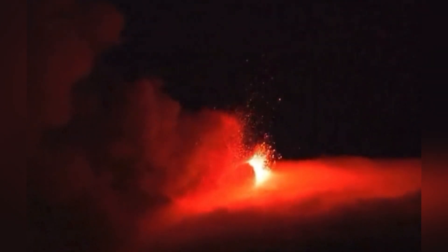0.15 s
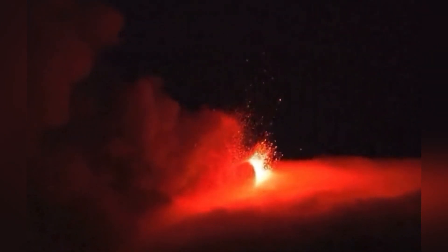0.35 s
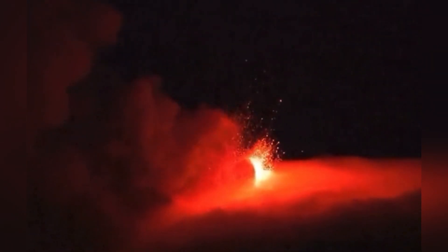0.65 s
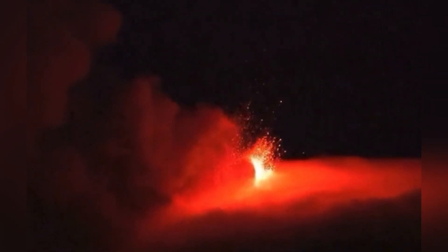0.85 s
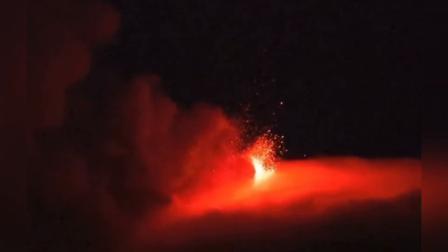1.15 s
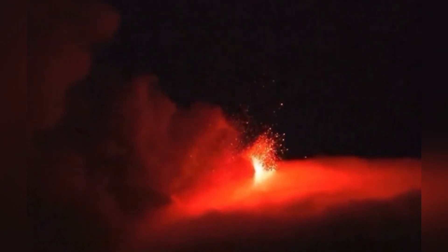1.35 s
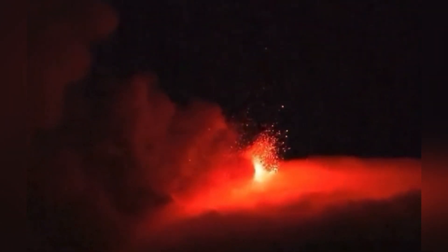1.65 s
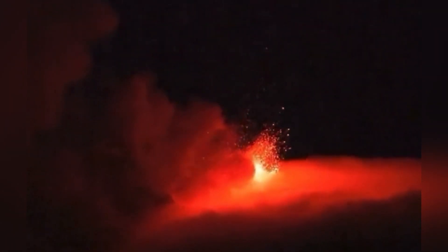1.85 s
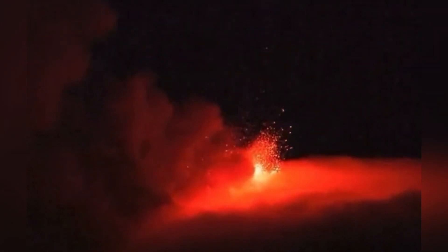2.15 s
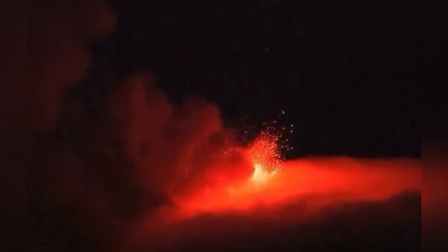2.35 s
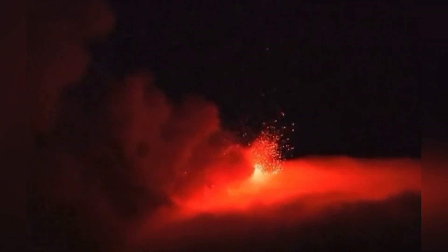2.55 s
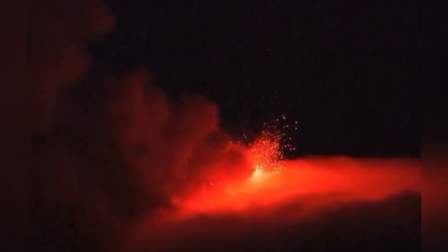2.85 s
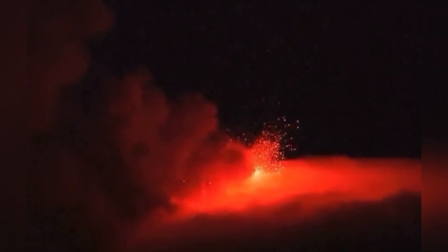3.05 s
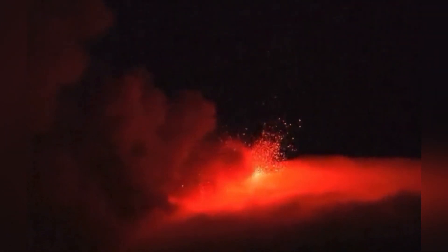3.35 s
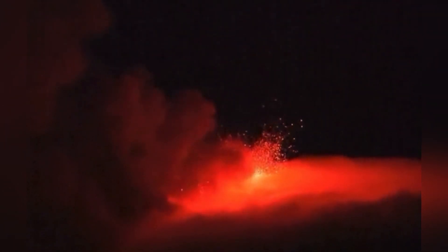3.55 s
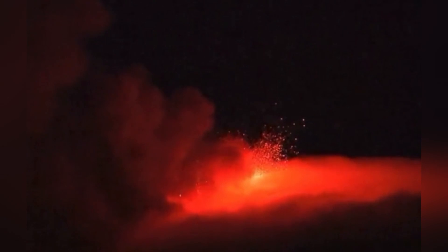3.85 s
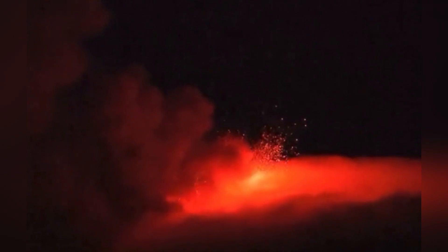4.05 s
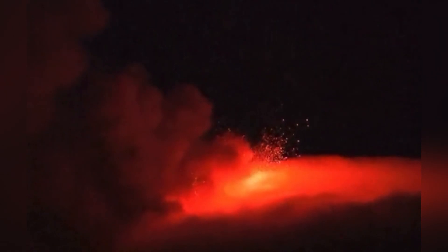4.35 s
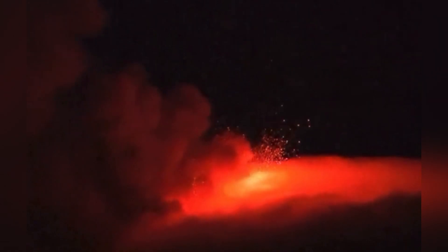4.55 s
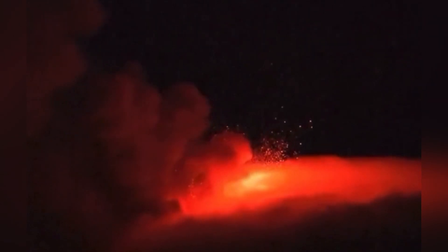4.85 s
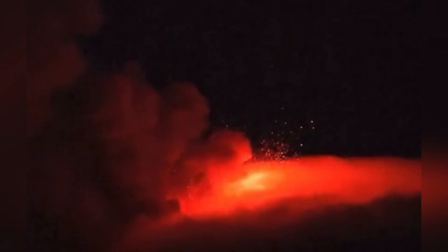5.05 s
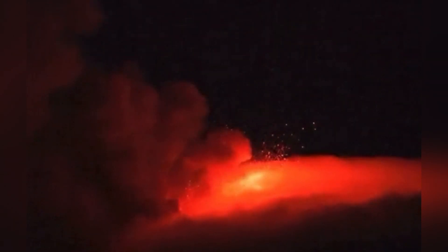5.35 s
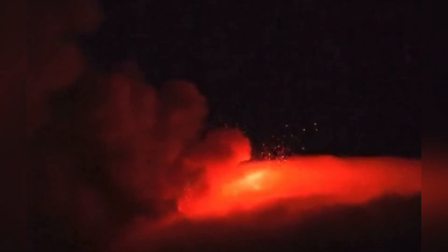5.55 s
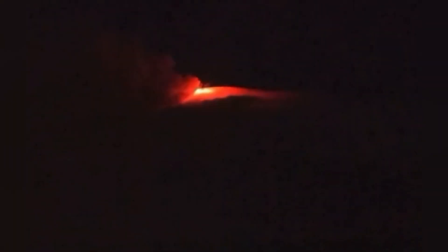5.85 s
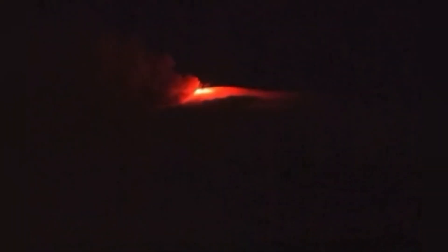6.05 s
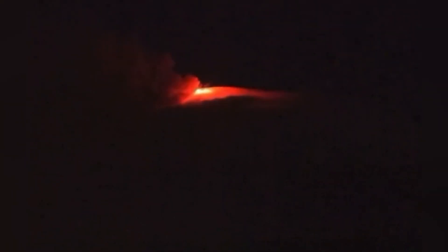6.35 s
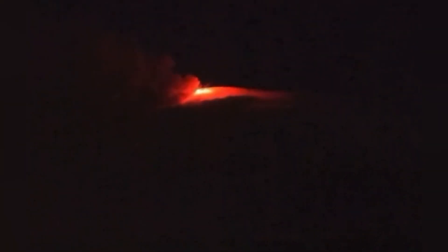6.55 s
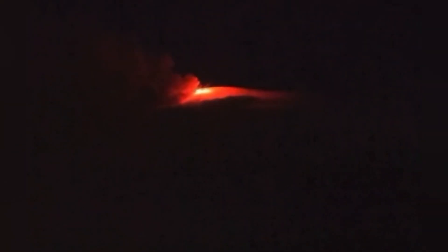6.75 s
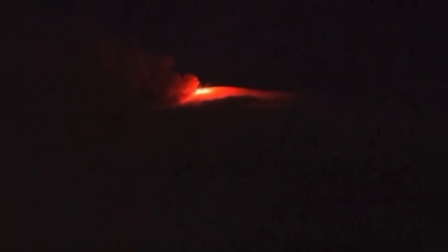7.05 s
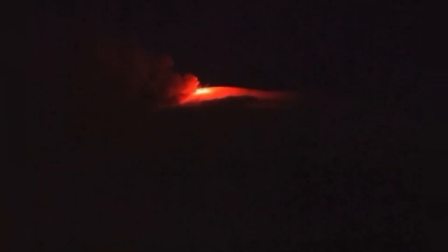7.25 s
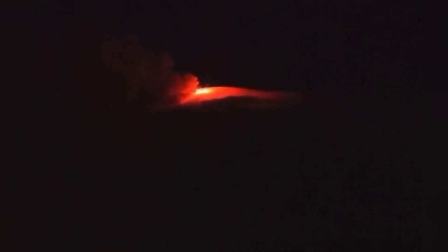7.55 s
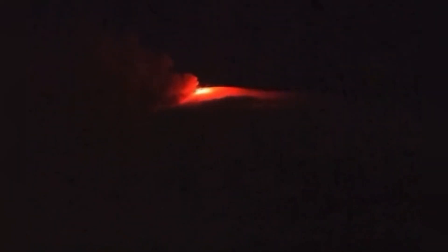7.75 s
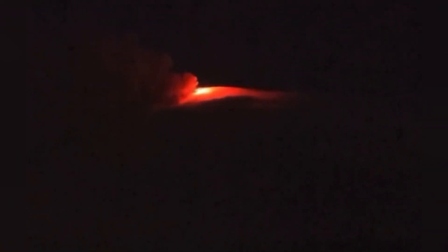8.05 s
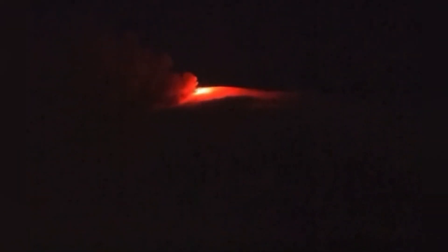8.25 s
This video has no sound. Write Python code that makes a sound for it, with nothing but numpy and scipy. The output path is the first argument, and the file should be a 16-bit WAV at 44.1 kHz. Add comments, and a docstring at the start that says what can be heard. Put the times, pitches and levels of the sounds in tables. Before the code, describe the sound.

Strong wind buffets the microphone over passing cars and an approaching clattering diesel, then a hard cut to a calmer engine drone and faint traffic.

```python
"""At a roadside, wind lumps, thumps and buffets the microphone while cars roll past as coloured tyre noise.
A turbo whistle then rises, and a diesel of exhaust tones, pulsed clatter and ringing panels draws near,
among a few soft knocks close by. A hard cut leads to a calmer spot in lighter wind: an engine drones
in shaft-order tones, a fainter engine note climbs, and far traffic is a dull noise that ebbs;
a few more knocks come late."""
import sys
import numpy as np
from scipy import signal
from scipy.fft import next_fast_len
from scipy.io import wavfile
from scipy.ndimage import uniform_filter1d

SR = 44100
rng = np.random.default_rng(int(sys.argv[2]) if len(sys.argv) > 2 else 0)


def bounce(signal):
    """Save signal as a 16-bit WAV file at the path given by the first command-line argument."""
    frames = np.transpose(np.atleast_2d(signal))
    limited = np.clip(frames, -1, 1)
    pcm = np.round(limited * 32767).astype(np.int16)
    wavfile.write(sys.argv[1], SR, pcm)


def gain_from_db(level_db):
    """Turn a decibel level (scalar or array-like) into a linear amplitude factor."""
    decades = np.asarray(level_db, float) / 20
    return 10 ** decades


N = 371318
T = np.arange(N) / SR  # seconds
CUT_S = 5.788  # the roadside gives way to the calmer spot


def evened(x):
    """Scales to rms 1."""
    return x / np.sqrt(np.mean(x ** 2) + 1e-20)


def smoothed(x, size):
    """Two running means of size samples in a row."""
    return uniform_filter1d(uniform_filter1d(x, size), size)


def read(points, hz):
    """A spectrum table read on a log-frequency axis."""
    f, value = np.transpose(points)
    return np.interp(np.log(hz + 1), np.log(f + 1), value)


def columns(rows, t=T):
    """Each column of a curve table over time."""
    s, *values = np.transpose(rows)
    return [np.interp(t, s, v) for v in values]


def bump(t, middle_s, lasting_s):
    """A bell of height 1 in time, down to 1/e at lasting_s from its middle."""
    return np.exp(-((t - middle_s) / lasting_s) ** 2)


def drift(seconds):
    """Random wander of rms 1, smoothed over the given time."""
    return evened(smoothed(rng.standard_normal(N), round(seconds * SR)))


def noise(colour_db, band_hz, size, patchy_db):
    """Random short-time spectra shaped by colour_db(hz, t), levelled to rms 1 inside band_hz over time."""
    frames, bins = 4 * N // size + 5, size // 2 + 1
    hz = np.arange(bins)[:, None] * SR / size
    t = np.arange(frames)[None] * size / 4 / SR
    real, imaginary, patches = rng.standard_normal((frames, bins, 3)).T
    patches = evened(uniform_filter1d(uniform_filter1d(patches, 12, 0), 10, 1))
    colour = gain_from_db(colour_db(hz, t)) * np.ones((bins, frames))
    in_band = (hz >= band_hz[0]) * (hz < band_hz[1])
    colour /= np.linalg.norm(colour * in_band, axis=0)
    spectra = (real + 1j * imaginary) * colour * gain_from_db(patchy_db * patches)
    whole_rms = np.sqrt(np.mean(np.sum(colour ** 2, 0)))  # in and out of the band
    sound = signal.istft(spectra, nperseg=size, noverlap=size * 3 // 4)[1][:N]
    return whole_rms * evened(sound)


def tone(hz, waver):
    """A sine of rms 1 on a pitch curve, its phase wavering by waver radians rms."""
    cycles = np.cumsum(hz) / SR + rng.random()
    return np.sqrt(2) * np.sin(2 * np.pi * cycles + waver * drift(0.015))


def wind():
    """Eddies press on the diaphragm as slow lumps and quicker thumps."""
    # Wind before the buffets clear it. Each row: time in seconds, level of the lumps in dB.
    strength = [(0, -23.5), (.35, -26.5), (.7, -19.5), (1.0, -27), (1.25, -32.5), (1.7, -25), (2.4, -31),
                (2.65, -31.5), (2.95, -35), (3.3, -39), (4.3, -38), (5.1, -43), (5.4, -28.5), (5.78, -31.5),
                (5.8, -48), (7.3, -46), (8.42, -48)]
    # Colours of the two kinds of eddy. Each row: frequency in Hz, density in dB per Hz.
    lump_colour = [(12, -5.5), (20, -2.5), (37, -1), (55, -4), (72, -15), (100, -22.5), (300, -150)]
    thump_colour = [(20, -71), (62, 2.5), (80, -1.5), (110, -5.5), (150, -14.5), (220, -35), (1000, -150)]
    lumps_db = columns(strength)[0]
    thumps_db = lumps_db - 3
    out = 0
    for points, level_db in (lump_colour, lumps_db), (thump_colour, thumps_db):
        eddies = noise(lambda hz, t: read(points, hz), (0, SR), size=4096, patchy_db=0.9)
        swing = abs(signal.hilbert(eddies, next_fast_len(N))[:N]) + 0.19
        fairly_even = eddies / smoothed(swing, 400) ** 0.25  # large eddies held back a little
        out = out + gain_from_db(level_db) * evened(fairly_even)
    return out


def buffeted(steady):
    """Each buffet pushes or pulls the diaphragm, rebounding on either side; the air around it gives way."""
    # Single buffets. Each row: middle in seconds, peak in dB, frequency in Hz.
    gusts = [(.015, -18, 45.2), (0.097, -16, 40), (0.133, -16.5, 50), (0.248, -10, 55), (.282, -13.5, 65),
             (.471, -16.5, 55), (.6, -17.5, 35.2), (0.652, -14.5, 50.3), (.69, -13.5, 60.6),
             (.765, -9.5, 50.3), (.849, -17, 43.7), (0.892, -16.5, 50), (0.959, -13, 48), (1.03, -14.5, 53),
             (1.446, -17, 55), (1.553, -15.5, 37.7), (1.724, -23.5, 60), (1.863, -17.5, 45.5),
             (1.911, -16.5, 41.2), (2.01, -15.5, 54.7), (2.39, -16, 52), (2.531, -14.5, 39.8),
             (2.685, -20, 44.6), (2.849, -22, 40), (3.139, -21, 54.4), (4.359, -23, 55), (4.536, -21.5, 58),
             (4.76, -19, 70), (5.324, -18, 44.3), (5.411, -15.5, 45.2), (5.55, -20, 45.87),
             (5.701, -26, 34.8), (6.6, -32, 28), (8.0, -32, 32)]
    half_length_cycles = 0.57
    cleared = 0.48  # share of the sound so far, earlier buffets too, taken away at the middle
    out = steady.copy()
    for (s, db, hz), way in zip(gusts, rng.choice([-1, 1], len(gusts))):
        out *= 1 - cleared * bump(T, s, 1 / hz)
        out += way * gain_from_db(db) * bump(T, s, half_length_cycles / hz) * np.cos(2 * np.pi * hz * (T - s))
    return out


def tyres():
    """Tread roar, brighter when near; groove air whooshes at sinking resonances; an engine ticks on top."""
    # Cars rolling by. Each row: time in seconds, roar in dB at 400-2500 Hz, nearness 0-1 that brightens it.
    passing = [(0, -40, 0.52), (.6, -40.5, 0.52), (.95, -42.5, 0.57), (1.35, -41, 0.69), (1.9, -38.5, 0.63),
               (2.15, -40.5, .55), (2.38, -39, .5), (2.6, -42, 0.37), (3.1, -44, 0.26), (3.6, -44, 0.17),
               (5.79, -44, 0.04)]
    # Roar close to the microphone and at a distance. Each row: frequency in Hz, density in dB per Hz.
    near_colour = [(88, -41), (150, -11), (196, -13), (294, -5.5), (477, -14), (624, -13), (883, -10.5),
                   (1180, -0.5), (1400, -8), (1700, -10), (2060, -12.5), (11200, -36.5), (12900, -53),
                   (15000, -87)]
    far_colour = [(88, -34), (150, -4.5), (185, 0), (216, -5), (350, -16.5), (416, -12.5), (477, -13),
                  (1110, -17), (1250, -18), (1700, -16.5), (5720, -51.5), (12600, -72), (15000, -83)]
    # Groove whooshes. Each row: loudest in seconds, lasting in seconds, frequency then in Hz,
    # height over the roar in dB.
    grooves = [(.15, 0.35, 1290, 4.5), (.6, 0.17, 1230, -1), (1.8, 0.25, 1180, -1), (2.36, 0.065, 1070, -1),
               (2.6, 0.073, 960, -16)]
    fall_hz_per_s, half_width_hz = 60, 150
    # Ticks of a passing engine. Each row: time in seconds, firing rate in Hz, depth 0-1.
    ticking = [(0, 43.8, .2), (.55, 44, 0.2), (.77, 39.7, 0.6), (1.5, 40.2, 0.9), (1.7, 40, 1),
               (2.1, 39.8, 0.8), (2.5, 38.4, 1), (2.8, 38, 0.3)]
    tick_band_hz, tick_swing_db = (4250, 6400), 7.5  # trough to peak at full depth

    def colour_db(hz, t):
        near = columns(passing, t)[1]
        groove_power = 0
        for s, lasting, f, db in grooves:
            off_centre = (hz - f + fall_hz_per_s * (t - s)) / half_width_hz
            groove_power = groove_power + gain_from_db(2 * db) * bump(t, s, lasting) / (1 + off_centre ** 2)
        roar_db = near * read(near_colour, hz) + (1 - near) * read(far_colour, hz)
        return roar_db + 10 * np.log10(1 + groove_power)

    roar = gain_from_db(columns(passing)[0]) * noise(colour_db, (400, 2500), size=1024, patchy_db=0.8)
    firing_hz, depth = columns(ticking)
    pulse = np.sin(np.pi * np.cumsum(firing_hz) / SR) ** 4  # one peak per firing
    tick = gain_from_db(tick_swing_db * depth * (pulse - 0.42))
    band = signal.butter(2, tick_band_hz, "band", fs=SR, output="sos")
    treble = signal.sosfiltfilt(band, roar)
    return roar + (tick - 1) * treble


def turbo():
    """A spinning turbo whistles as one gliding tone, its pitch more smeared the fainter it is."""
    # Whistle. Each row: time in seconds, pitch in Hz, level in dB before its random flicker.
    glide = [(2.4, 9250, -105), (2.72, 9420, -89), (2.9, 9550, -87), (3.15, 9620, -92), (3.4, 9670, -88),
             (3.9, 9840, -87), (4.2, 9760, -87), (4.45, 9660, -82), (4.64, 9770, -68), (4.76, 9880, -68),
             (4.97, 10170, -70), (5.18, 10310, -70), (5.33, 10420, -75), (5.45, 10560, -66),
             (5.56, 10700, -74), (5.63, 11000, -65), (5.69, 11150, -75), (5.79, 11500, -67)]
    hz, db = columns(glide)
    fuzz = np.clip(.004 - .0004 * (db + 72), .004, .012)  # share of the pitch
    smeared_hz = hz * (1 + fuzz * drift(.001) + 0.0015 * drift(.02))
    return gain_from_db(db + 2.6 * drift(0.03)) * tone(smeared_hz, waver=.7)


def diesel():
    """Exhaust orders, clatter that puffs at each firing, panels that ring with it, and the turbo."""
    # The engine. Each row: time in seconds, firing rate in Hz, fourth exhaust order in dB,
    # clatter in dB at 4-9 kHz.
    running = [(2.8, 48.08, -56, -73), (3.1, 47.4, -47.5, -85), (3.4, 46.53, -45, -92),
               (3.75, 45.74, -46, -68), (4, 44.56, -49.5, -64), (4.33, 44.44, -52, -63.5),
               (4.42, 45.07, -53, -57.5), (4.7, 44.7, -52, -54), (5.1, 47.52, -47.5, -52.5),
               (5.5, 49.16, -50, -52.5), (5.79, 51.6, -48, -55.5)]
    # Clatter at the reference level. Each row: frequency in Hz, density in dB per Hz.
    clatter_points = [(180, -13), (300, -0.5), (658, -14.5), (738, -15.5), (1190, -8), (2100, -9.5),
                      (2600, -7), (4320, -10), (5090, -16.5), (7420, -19), (10500, -28.5), (12500, -28),
                      (14300, -30), (15000, -67)]
    # Engine panels. Each row: centre in Hz, width in Hz, relative height on the clatter colour in dB
    # before it swells or rings in fits, loudest in seconds.
    panel_rows = [(745, 45, 22.5, 5.2), (970, 80, 10, 4.0), (1600, 75, 15, 4.1), (2100, 80, 15.5, 5.15),
                  (2960, 160, 8, 5.1), (3300, 130, 4, 5.5), (3480, 120, 7, 4.0), (3900, 300, 4, 4.1),
                  (4290, 140, 8.5, 4.7), (5490, 300, 2, 5.2), (6860, 180, 4, 5.2), (7280, 250, 8, 4.0)]
    facing_s = 0.88  # how long a panel faces the microphone
    hz, fourth_db, clatter_db = columns(running)
    reference_db = -49.5  # clatter level from which distance is reckoned
    over_reference_db = clatter_db - reference_db

    first_db = -32 + 0.2 * over_reference_db
    exhaust = gain_from_db(first_db) * (tone(hz, waver=0.11) + 0.39 * tone(2 * hz, waver=0.52))
    exhaust += gain_from_db(fourth_db) * tone(4 * hz, waver=.15)
    # a low note swells briefly below the second order, gliding up
    hum_s = 4.7
    exhaust += gain_from_db(-40.5) * bump(T, hum_s, 0.26) * tone(82 + 12 * (T - hum_s), waver=.2)

    def clatter_colour_db(f, t):
        far_db = columns(running, t)[2] - reference_db  # quieter means farther, and distance dulls the treble
        return read(clatter_points, f) + 0.47 * far_db * np.log2(f / 6000 + 0.21)

    ringing_db = [2.3 * drift(.015) for _ in panel_rows]  # each panel rings in fits

    def panel_colour_db(f, t):
        peaks = 0
        for (centre, width, db, s), fits_db in zip(panel_rows, ringing_db):
            power = gain_from_db(2 * (db + np.interp(t, T, fits_db))) * (0.22 + bump(t, s, facing_s))
            peaks = peaks + power / (1 + (2 * (f - centre) / width) ** 2) ** 2
        return clatter_colour_db(f, t) + 10 * np.log10(peaks)

    turns = np.cumsum(hz) / SR  # firings so far
    uneven = gain_from_db(2.5 * rng.uniform(-1, 1, 1000))[turns.astype(int)]  # no two firings alike
    strong = (1 + 0.59 * (turns % 2 < 1)) * uneven  # every second cylinder knocks harder
    puffs = evened(1 + 0.61 * strong * np.sin(np.pi * (turns % 1) ** 0.45) ** 4)
    clatter = puffs * noise(clatter_colour_db, (4000, 9000), size=2048, patchy_db=1.6)
    ringing = puffs * noise(panel_colour_db, (4000, 9000), size=1024, patchy_db=1.8)
    panels = gain_from_db(-3.2 + .5 * over_reference_db) * ringing
    heard = np.clip((T - running[0][0]) / 0.045, 0, 1)  # fades in over 45 ms
    return heard * (exhaust + gain_from_db(clatter_db) * (clatter + panels)) + turbo()


def drone():
    """Shaft orders of an engine, the fifth booming in the exhaust, and one more engine note."""
    # The engine. Each row: time in seconds, shaft rate in Hz, second order in dB, fifth order in dB.
    shaft = [(5.79, 34.26, -31.5, -31), (6.04, 33.4, -32, -35.5), (6.27, 34.24, -32.5, -39.5),
             (6.54, 34.34, -31, -36.5), (6.76, 35.39, -34, -46.5), (7.05, 36.57, -34.5, -46.5),
             (7.32, 34.7, -36.5, -52.5), (7.4, 34.07, -38, -40), (7.62, 32.76, -36, -39),
             (7.69, 31.95, -40, -47), (7.83, 32.34, -33.5, -43), (7.98, 32.3, -40, -47),
             (8.17, 32.5, -34.5, -49), (8.42, 32.93, -39.5, -42.5)]
    # Weaker orders. Each row: multiple of the shaft rate, level against the second order in dB
    # before its swell, loudest in seconds.
    weak_orders = [(1.5, -10, 6.3), (4, -15, 7.05), (6, -25, 6.1), (7, -21, 6.4), (9, -19, 7.1)]
    # A fainter engine note that climbs. Each row: time in seconds, pitch in Hz, level in dB.
    climber = [(5.79, 99.4, -44.5), (6.4, 106.7, -41), (6.7, 110.9, -40), (7.1, 117.7, -61),
               (7.5, 122.7, -40), (8.42, 128, -74)]
    hz, second_db, fifth_db = columns(shaft)
    weak = 0
    for multiple, db, s in weak_orders:
        swell = 0.33 + 0.49 * bump(T, s, 0.32)
        weak = weak + gain_from_db(db + 2.0 * drift(0.19)) * swell * tone(multiple * hz, waver=0.19)
    strong = gain_from_db(second_db) * tone(2 * hz, waver=.12) + gain_from_db(fifth_db) * tone(5 * hz, waver=.18)
    climber_hz, climber_db = columns(climber)
    return strong + gain_from_db(second_db) * weak + gain_from_db(climber_db) * tone(climber_hz, waver=0.22)


def knocks():
    """Each is a short dull ring of three modes with a soft start."""
    # Knocks and ticks close by. Each row: start in seconds, main mode in dB before its decay,
    # main mode in Hz, fall by 60 dB in seconds.
    hits = [(2.286, -29.5, 366, 0.069), (2.625, -30, 910, .03), (3.065, -32, 960, 0.028),
            (7.192, -31.5, 990, 0.033), (7.244, -24.5, 286, 0.032), (7.443, -29, 1090, 0.021),
            (7.472, -32.5, 1740, 0.0068)]
    out, t = np.zeros(N), np.arange(SR // 5) / SR
    for s, db, hz, t60 in hits:
        modes = np.sin(2 * np.pi * hz * t)
        modes += 0.52 * np.sin(2 * np.pi * 0.654 * hz * t)
        modes += .5 * np.sin(2 * np.pi * 1.33 * hz * t)
        soft_start = np.clip(t * hz, 0, 1)  # one cycle of the main mode
        out[round(s * SR):][:len(t)] += gain_from_db(db - 60 * t / t60) * modes * soft_start
    return out


def road():
    """Traffic far off is a dull, smooth roar that ebbs after the cut."""
    # Distant roar. Each row: frequency in Hz, density in dB per Hz.
    distant_colour = [(53, -23), (90, -4), (114, -9.5), (171, -10.5), (251, -14), (332, -17.5),
                      (429, -18.5), (889, -18.5), (1060, -18), (1580, -28), (2280, -34), (3140, -44),
                      (12400, -71.5), (15000, -95)]
    first_db, settled_db, settle_s = -41, -44.5, 1  # levels at 200-2000 Hz
    level_db = settled_db + (first_db - settled_db) * np.exp(-np.maximum(T - CUT_S, 0) / settle_s)
    return gain_from_db(level_db) * noise(lambda hz, t: read(distant_colour, hz), (200, 2000), size=1024, patchy_db=0.72)


def scene():
    """Two moments joined by a hard cut."""
    after = np.clip((T - CUT_S) * SR, 0, 1)
    before = 1 - after
    air = buffeted(before * wind() + after * wind())  # separate eddies on either side
    roadside = before * (tyres() + diesel())
    calmer_spot = after * (drone() + road())
    return (air + roadside + calmer_spot + knocks())[None]


def band_limit(x):
    """A steep low-pass at the top of the band."""
    return signal.sosfilt(signal.butter(12, 15340, fs=SR, output="sos"), x)


def record(dry):
    """Microphone hiss, a band limit at 14.4 kHz and a soft ending of 4 ms."""
    hiss = gain_from_db(-74.0) * rng.standard_normal(dry.shape)
    lowpass = signal.firwin(255, 14400, window=("kaiser", 8), fs=SR)
    limited = signal.oaconvolve(dry + hiss, lowpass[None], "same")
    ending = np.clip((T[-1] - T) / .004, 0, 1)
    return band_limit(limited * ending)


dry = scene()
out = record(dry)
bounce(out)
```